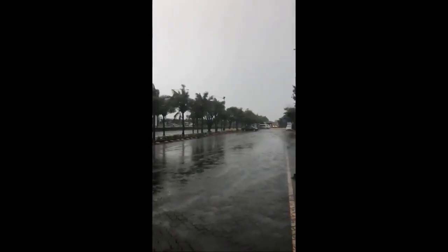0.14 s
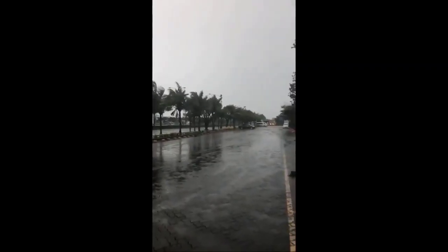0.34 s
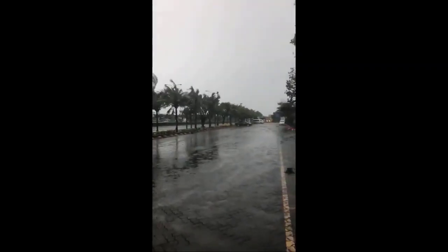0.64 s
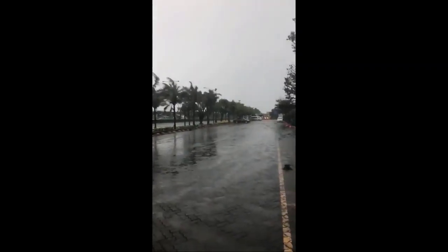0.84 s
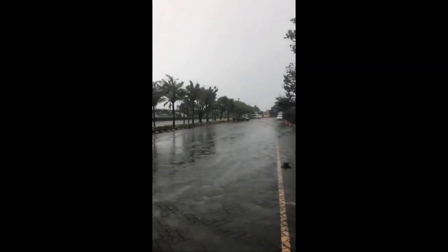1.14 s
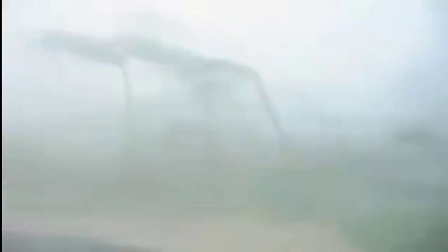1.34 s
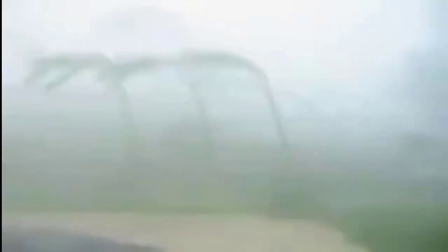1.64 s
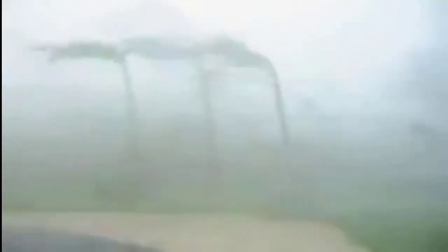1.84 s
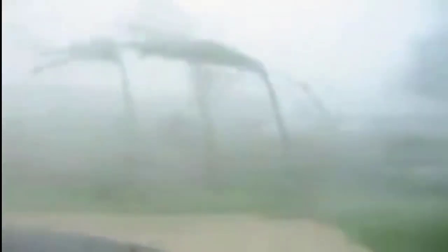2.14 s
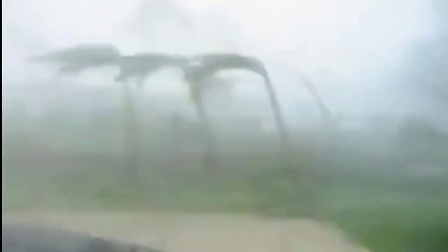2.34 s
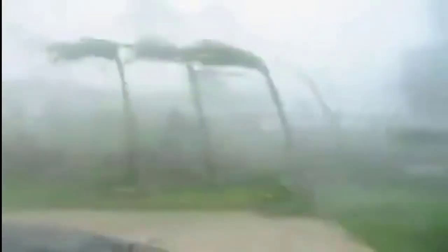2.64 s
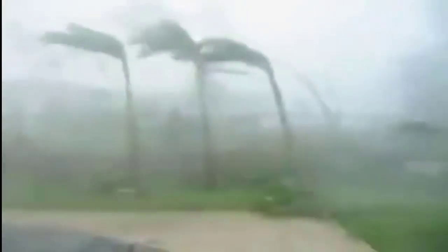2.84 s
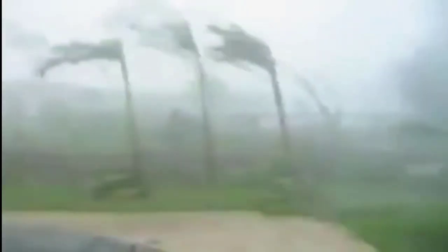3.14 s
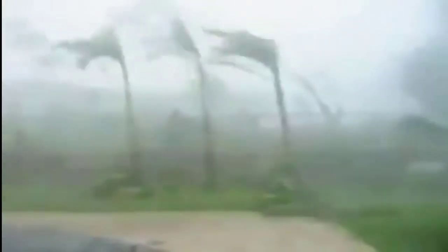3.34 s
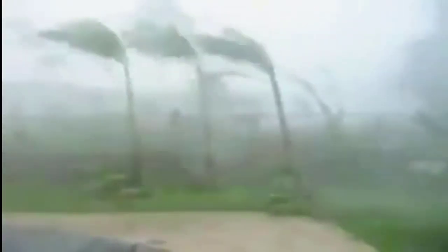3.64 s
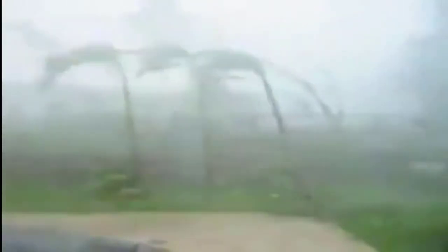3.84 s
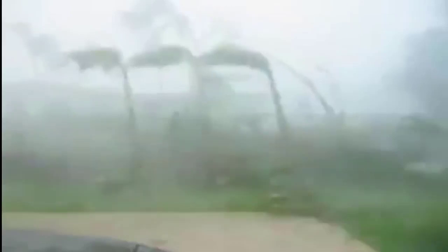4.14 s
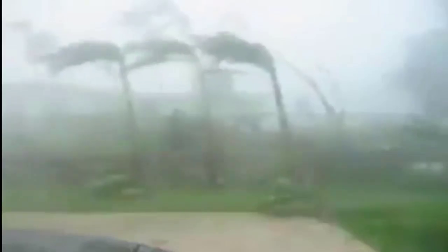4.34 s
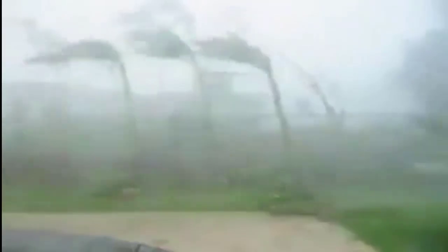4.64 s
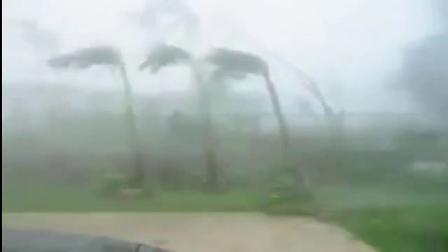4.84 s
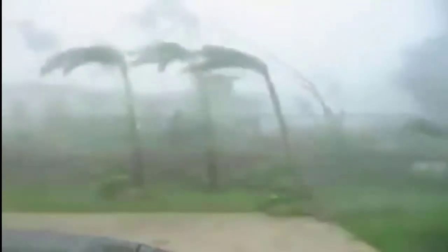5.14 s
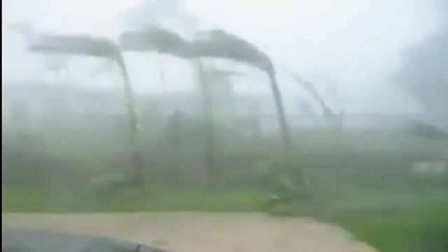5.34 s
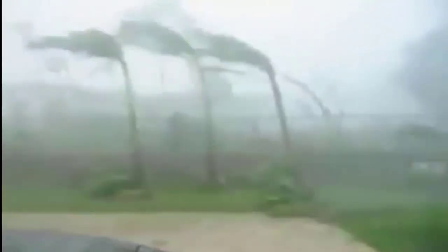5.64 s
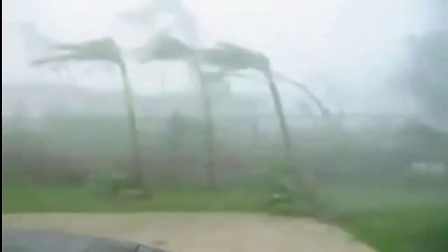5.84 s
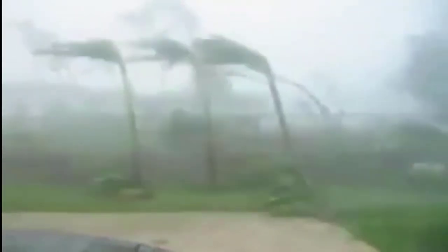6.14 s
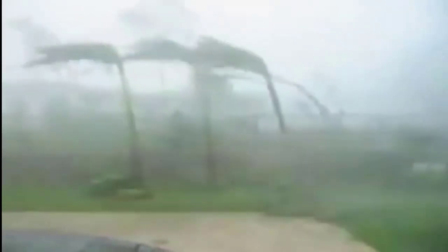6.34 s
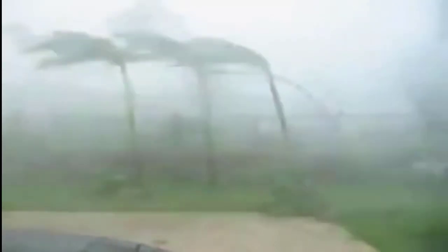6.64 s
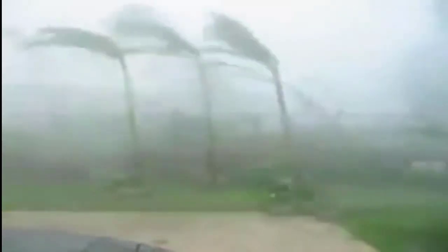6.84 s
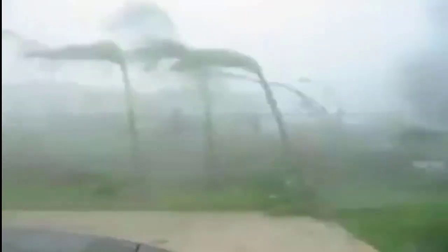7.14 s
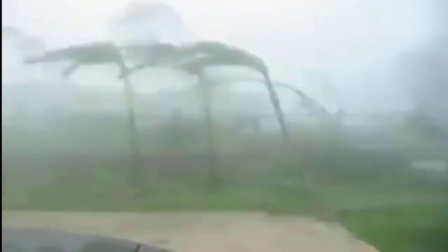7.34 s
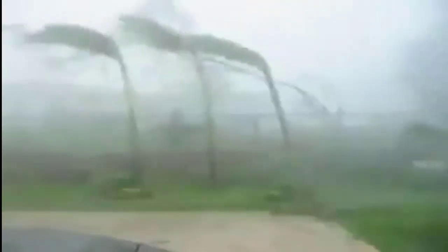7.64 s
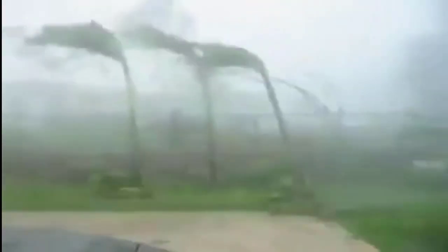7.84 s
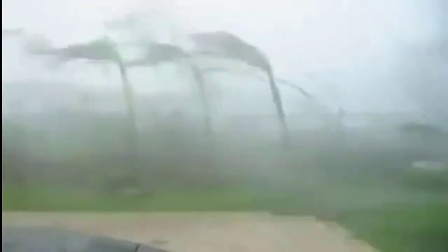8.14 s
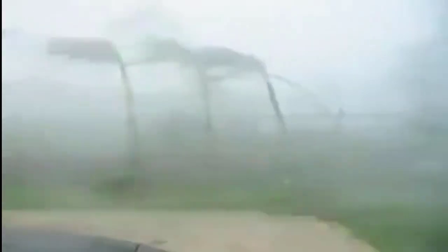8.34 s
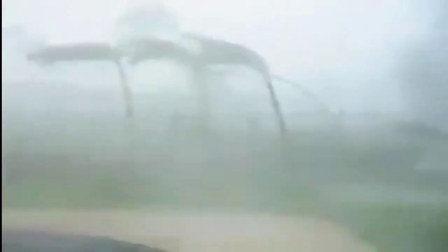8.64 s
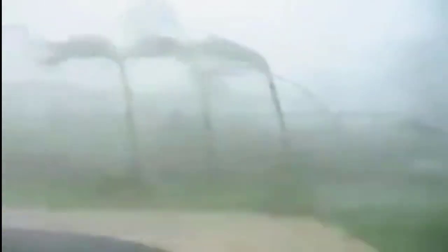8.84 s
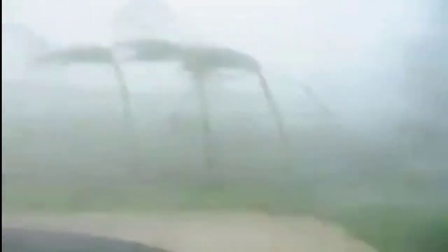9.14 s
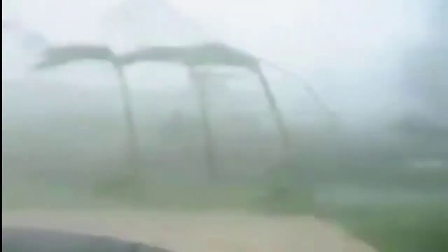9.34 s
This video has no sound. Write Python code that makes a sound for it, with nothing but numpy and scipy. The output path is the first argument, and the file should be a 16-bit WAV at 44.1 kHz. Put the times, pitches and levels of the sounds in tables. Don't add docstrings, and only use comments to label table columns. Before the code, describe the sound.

Brief roadside wind buffeting and spray hiss, an abrupt cut, then an overdriven gale booming, howling and lashing rain in flurries on a parked car.

```python
import sys
import numpy as np
from scipy import signal
from scipy.io import wavfile
from scipy.ndimage import uniform_filter1d

SR = 44100
rng = np.random.default_rng(int(sys.argv[2]) if len(sys.argv) > 2 else 0)


def master_out(mix):
    frames = np.transpose(np.atleast_2d(mix))
    ceiling = np.clip(frames, -1, 1)
    pcm = np.round(ceiling * 32767).astype(np.int16)
    wavfile.write(sys.argv[1], SR, pcm)


def gain_from_decibels(decibels):
    exponent = np.asarray(decibels, float) / 20
    return 10 ** exponent


N = 418950
T = np.arange(N) / SR
CUT_S = 1.39907
ROADSIDE = int(CUT_S * SR) + 1


def rms_one(x):
    return x / np.sqrt(np.mean(x ** 2) + 1e-20)


def white(size=N):
    return rng.standard_normal((2, size))


def drift(rate, size=N):
    r = np.exp(-40 * np.pi * rate / SR)
    noise = rng.standard_normal(size // 20 + 4002)
    slow = signal.lfilter([1], [1, -2 * r, r * r], noise)[4000:]
    return np.interp(np.arange(size) / 20, np.arange(len(slow)), rms_one(slow))


def in_time(rows, size=N):
    s, *columns = np.transpose(rows)
    return [np.interp(T[:size], s, column) for column in columns]


def bumps(rows, fall=None, size=N):
    s, rise, *lifts = np.transpose(rows)
    out = np.zeros((len(lifts), size))
    for k, middle in enumerate(s):
        up = max(rise[k], .01)
        start, end = middle - up, middle + max(fall or up, .01)
        span = slice(max(int(start * SR), 0), int(end * SR))
        shape = np.interp(T[:size][span], [start, middle, end], [0, 1, 0])
        out[:, span] += np.outer([lift[k] for lift in lifts], shape)
    return out


def cut(x, hz, kind, order=4):
    return signal.sosfilt(signal.butter(order, hz, kind, fs=SR, output="sos"), x)


def resonance(hz, width):
    r, w = np.exp(-np.pi * width / SR), 2 * np.pi * hz / SR
    noise = rng.standard_normal(N + SR)
    return rms_one(signal.lfilter([1, 0, -1], [1, -2 * r * np.cos(w), r * r], noise)[SR:])


def evened(x, size, share):
    power = uniform_filter1d(x ** 2, size=size) + 1e-12
    return rms_one(x / power ** (np.clip(share, 0, 1) / 2))


def coloured(sources, spectrum, shared_db, own_db, own_rate, tilt_db=0):
    hz, db = np.transpose(spectrum)
    edges = np.geomspace(hz[0], hz[-1], int(3 * np.log2(hz[-1] / hz[0])) + 2)
    out, flat = 0, 0
    for k, (low, high) in enumerate(zip(edges, edges[1:])):
        centre = np.sqrt(low * high)
        band = cut(sources[k % 2], [low, high], "band", order=2)
        band = band * gain_from_decibels(np.interp(np.log(centre), np.log(hz), db))
        flat = flat + np.mean(band ** 2)
        flicker_db = shared_db + own_db * drift(own_rate, size=len(band))
        out = out + band * gain_from_decibels(flicker_db + tilt_db * np.log2(centre / 1500))
    return out / np.sqrt(flat)


# t/s, level/dB, brightening/dB per octave
SPRAY = [
    (0.0, -62, 6.5),
    (0.236, -56.5, 2),
    (0.482, -56, 1),
    (1.052, -51, 1.5),
    (1.39, -48, 0.5),
]
# f/Hz, level/dB per Hz
SPRAY_COLOUR = [(300, -19), (500, -8), (1000, -6), (1600, -4.5), (2360, -18.5), (3500, -29), (5000, -34.5),
                (7000, -43.5), (10000, -47), (15000, -54)]


def spray():
    level_db, tilt_db = in_time(SPRAY, size=ROADSIDE)
    flutter_db = .5 * drift(6.3, size=ROADSIDE)
    hiss = coloured(white(size=ROADSIDE), SPRAY_COLOUR, flutter_db, own_db=1.7, own_rate=14, tilt_db=tilt_db)
    return gain_from_decibels(level_db + 2.7) * hiss


# t/s, level/dB
BREEZE = [
    (0, -29.5),
    (.21, -31),
    (.26, -39),
    (.31, -42),
    (.5, -44),
    (.65, -41.5),
    (1.39, -41),
]
# t/s, half length/s, lift/dB, extra lift of the sharp eddies/dB
PUFFS = [(.09, .05, -1.5, 4), (.14, 0.07, -0.5, -8), (.37, 0.034, 6.5, 0), (.40, 0.035, -5, -2),
         (.48, .035, -8, 0), (.52, 0.033, 5.5, -3), (.575, 0.04, 11, 11), (.87, 0.084, 5, 2.5),
         (.96, .03, -3.5, 4), (.99, 0.025, -10, 6), (1.07, 0.075, 1.5, 7), (1.13, .05, 9, -16),
         (1.18, .03, -12, 10), (1.22, 0.043, 5, 2.5), (1.39, 0.048, -5, 6.5)]
# f/Hz, level/dB per Hz
TURBULENCE = [(30, -32), (50, -5), (100, -7), (170, -8.5), (330, -16), (500, -40)]


def port_wind():
    lift_db, extra_db = bumps(PUFFS, size=ROADSIDE)
    low_db = in_time(BREEZE, size=ROADSIDE)[0] + lift_db
    sharp_db = -57.5 + 1.87 * (low_db + 41) + extra_db
    lumps = drift(32, size=ROADSIDE)
    low = coloured(white(size=ROADSIDE), TURBULENCE, 0, own_db=2.5, own_rate=23)
    low = evened(low, size=900, share=0.57)
    sharp = cut(cut(rng.standard_normal(ROADSIDE), 167, "high", order=2), 640, "low")
    sharp = evened(sharp, size=500, share=0.38)
    return gain_from_decibels(low_db + 2 * lumps) * low + gain_from_decibels(sharp_db + 4.5 * lumps) * sharp


# t/s (middle), peak level/dB, swing f/Hz, half length/s
THUDS = [(.018, -26, 107, 0.011), (.186, -24.5, 74.6, 0.0081), (.205, -28.5, 162, .008),
         (.224, -21.5, 139, 0.0026), (.372, -38, 206, 0.0075), (.571, -28.5, 210, 0.0089),
         (.587, -16, 134, 0.005), (.832, -29.5, 134, 0.013), (.886, -29, 176, 0.0144),
         (1.07, -35.5, 205, 0.014), (1.153, -32, 106, 0.0066), (1.265, -23.5, 101, 0.0043)]


def thuds():
    out = np.zeros(ROADSIDE)
    for s, peak_db, hz, half in THUDS:
        age = T[:ROADSIDE] - s
        out += gain_from_decibels(peak_db) * np.exp(-(age / max(half, .003)) ** 2) * np.sin(2 * np.pi * hz * age)
    return out


# t/s, peak level/dB, length/s, rasp share/dB
SLAPS = [(.001, -24.5, 0.0016, -4.5), (.009, -27, 0.007, -33), (0.064, -29.5, 0.0089, -24),
         (0.042, -28, 0.0067, -24), (0.022, -34, .005, -30), (0.054, -33, 0.0073, -29),
         (0.088, -42, 0.006, -40), (0.11, -35, .006, -25), (0.13, -33, 0.007, -28),
         (0.1596, -17.5, 0.0049, -30), (0.184, -9.5, 0.0058, -31), (0.2, -42, 0.0041, -32),
         (0.209, -34, 0.0093, -26), (0.22, -35, 0.0031, -24), (0.349, -39, .008, -31),
         (0.506, -39, 0.0066, -23), (0.532, -42, .006, -20), (0.567, -32, 0.0054, -29),
         (0.581, -33, .008, -22), (0.607, -35, 0.0019, -31), (0.631, -29.5, 0.0027, -27),
         (0.819, -33, 0.0065, -29), (.872, -36, 0.011, -29)]


def slaps():
    body, rasp = np.zeros((2, ROADSIDE))
    for s, peak_db, length, rasp_db in SLAPS:
        age = np.clip(T[:ROADSIDE] - s, 0, .1)
        shape = gain_from_decibels(peak_db) * np.minimum(age / .0008, 1) * np.exp(-(age / max(length, .002)) ** 2.5)
        body += shape
        rasp += shape * gain_from_decibels(rasp_db)
    middle, bright = white(size=ROADSIDE)
    middle = cut(cut(middle, 200, "high", order=2), 1520, "low", order=8)
    middle = evened(middle, size=120, share=0.87)
    bright = rms_one(cut(bright, [3500, 11000], "band", order=1))
    return gain_from_decibels(-9) * body * middle + gain_from_decibels(-10) * rasp * bright


# t/s, half length/s, lift/dB
MOANS = [
    (2.3, 0.3, 20),
    (2.85, 0.16, 19),
    (5.6, .12, 10),
    (5.9, 0.45, 16.5),
    (6.8, .2, 8),
    (8.5, 0.15, 7),
]


def moan():
    return gain_from_decibels(-61 + bumps(MOANS)[0]) * evened(resonance(247.8, 7.2), size=2500, share=0.57)


# f/Hz, level/dB per Hz
ROAR = [(45, -2.5), (60, -14), (75, -5.5), (102, -10), (152, -6.5), (222, -15), (285, -14.5), (407, -23.5),
        (600, -33)]
# t/s, half length/s, lift/dB
HOWLS = [(2.55, 0.21, 8), (3.35, .15, -0.5), (2.95, 0.82, 19), (3.65, 0.26, 12), (3.87, 0.11, -15),
         (4.32, 0.25, -11), (4.63, 0.18, 17.5), (5.4, 0.33, 11.5), (5.9, .3, 11), (6.59, 0.12, -20),
         (7.38, 0.077, 16), (7.81, .15, 12.5), (8.46, 0.51, 8), (9.02, 0.11, 13), (9.5, .3, 7)]


def gale(roar_db):
    roar = coloured(white(), ROAR, 1.5 * drift(15.5), own_db=0.0, own_rate=20)
    howl = evened(resonance(281, 6), size=2500, share=.75)
    howl_db = -54 + bumps(HOWLS)[0]
    return gain_from_decibels(roar_db + 0.25) * roar + gain_from_decibels(howl_db - 2.5) * howl


# f/Hz, width/Hz, level/dB
SWAY = [(6, 1.4, -34), (8.2, 2.0, -38), (10.5, 1.0, -37)]
# f/Hz, width/Hz, level/dB
BOOM = [(41.9, 7.1, 1.2), (31.6, 8.2, -7), (52, 8.4, -5), (21.1, 3.6, -7)]


def car_body(boom_db):
    sway = sum(gain_from_decibels(db) * resonance(hz, width) for hz, width, db in SWAY)
    boom = sum(gain_from_decibels(db) * resonance(hz, width) for hz, width, db in BOOM)
    boom = evened(cut(boom, 65, "low"), size=1600, share=0.59)
    return cut(sway, 10.7, "low") + gain_from_decibels(boom_db + 0.5) * boom


# t/s, level/dB, brightening/dB per octave
DOWNPOUR = [(1.41, -44, 0), (1.85, -45, -2.5), (2.56, -45, -1.5), (3.05, -46, -1.5), (3.44, -40.5, -1.3),
            (3.84, -43, -0.5), (4.3, -45, -1.2), (4.8, -39.5, -1), (5.19, -42, -1.1), (5.45, -36, -0.3),
            (5.75, -43, -1.6), (6.25, -41, 0.2), (6.9, -40.5, -0.8), (7.25, -47.5, -2.3), (7.8, -40, 0.2),
            (8.2, -41.5, 0.1), (8.95, -41, 0.8), (9.25, -40, -1.4)]
# t/s (peak), build-up/s, lift/dB
FLURRIES = [(1.45, 0.028, 4.5), (1.74, .12, 1.5), (1.93, 0.061, 4), (2.17, 0.11, 2.5), (2.33, 0.099, 3.5),
            (2.54, 0.43, 4), (2.83, 0.096, 5), (2.95, .04, 4.5), (3.75, 0.22, 2.5), (3.93, 0.05, 3),
            (4.5, 0.15, 7), (4.65, 0.069, 2.5), (4.76, 0.027, 2), (4.92, 0.32, 2.5), (5.25, 0.073, 2.5),
            (5.46, 0.18, 0.5), (5.72, 0.025, 5.5), (5.97, 0.043, 3.5), (6.12, 0.15, 6.5), (6.3, 0.12, 3.5),
            (6.43, 0.14, 4), (6.77, 0.097, 6.5), (6.85, 0.048, 3.5), (7.52, .05, 5), (7.61, .04, 2),
            (8.44, 0.23, 7.5), (8.53, 0.08, 3), (8.76, .12, 2.5), (8.87, 0.064, 6), (9.44, 0.13, 5.5)]
# t/s, half length/s, lift/dB
SPATTERS = [(1.62, .03, -5), (1.67, 0.036, 3), (2.03, 0.036, -0.5), (2.59, .05, -3), (2.7, .05, 2.5),
            (3.22, 0.029, 4), (3.83, .04, -4.5), (4.1, 0.038, 2), (4.58, 0.046, -1.5), (4.69, 0.034, -3.5),
            (5.7, .06, -2), (6.06, .04, -2), (6.63, .03, -2.5), (6.98, 0.037, 3.5), (7.2, .04, 1.5),
            (7.3, .05, 0), (7.42, 0.1, 2), (8.17, 0.087, -4), (8.97, 0.056, 4), (9.24, 0.027, -6.5),
            (9.32, 0.045, 2), (9.43, .03, -2.5)]
# f/Hz, level/dB per Hz
RAIN = [(230, -14.5), (380, -5), (733, -1), (1270, -7.5), (2230, -7), (3170, -14.5), (3600, -18),
        (4500, -21.5), (5200, -8.5)]
# f/Hz, level/dB per Hz
GRIT = [(5000, 2.5), (7000, -3), (10000, -4), (13000, -9), (15500, -14)]


def rain():
    drops_per_s, band_top_hz, grit_level_db = 6000, 5257, -65
    weight_db, tilt_db = in_time(DOWNPOUR)
    lift_db = bumps(FLURRIES, fall=0.04)[0] + bumps(SPATTERS)[0]
    rain_db = weight_db + lift_db
    tilt_db = tilt_db + 0.14 * lift_db
    sizes = gain_from_decibels(2.04 * np.minimum(rng.exponential(1, (2, N)), 5))
    signs = rng.choice([-1, 1], (2, N))
    drops = sizes * signs * (rng.random((2, N)) < drops_per_s / SR)
    flurry_db = 0.86 * drift(9.5) + 0.61 * drift(43)
    sheet = coloured(drops, RAIN, flurry_db, own_db=0.91, own_rate=18, tilt_db=tilt_db)
    sheet = signal.sosfilt(signal.cheby2(10, 40, 1.05 * band_top_hz, fs=SR, output="sos"), sheet)
    grit = coloured(drops[::-1], GRIT, 0.47 * flurry_db + 0.5 * tilt_db, own_db=0.1, own_rate=21)
    grit_db = 0.62 * (rain_db - rain_db.mean()) + grit_level_db
    return gain_from_decibels(rain_db + 2) * sheet + gain_from_decibels(grit_db) * grit


# t/s, half length/s, roar lift/dB, boom lift/dB
BUFFETS = [(1.41, .11, 0, -8), (1.75, .1, 3, -1.5), (1.86, 0.056, -5.5, 1.5), (1.93, 0.062, 6, -12),
           (2.0, 0.2, -5.5, 4.5), (2.3, .07, 2.5, -2.5), (2.38, 0.13, 4.5, 3.5), (2.78, 0.15, -0.5, -4.5),
           (3.08, 0.069, -5, 4.5), (3.19, .08, -1.5, 0), (3.26, 0.092, 4, -0.5), (4.16, 0.23, 3, -0.5),
           (4.5, .2, -0.5, -3), (4.77, 0.047, -1, -2), (5.42, .14, -1, -6), (5.74, 0.1, 5, -6),
           (6.6, 0.21, -3.5, -0.5), (6.77, 0.31, 3, -1), (7.02, 0.11, -3, 2.5), (7.09, 0.047, 5.5, -4),
           (7.13, 0.06, -4, 5.5), (7.83, 0.12, 0.5, -5.5), (7.92, 0.082, -4.5, 1), (8.39, 0.13, 4, -1),
           (8.53, .1, -0.5, -5.5), (8.73, 0.047, 0, 0.5), (8.82, 0.036, 2.5, 2.5), (8.91, 0.071, -4, 1),
           (9.02, 0.099, 2, 0.5), (9.41, 0.081, 0.5, 1.5)]


def scene():
    roar_lift_db, boom_lift_db = bumps(BUFFETS)
    weight_db = in_time(DOWNPOUR)[0]
    roar_db = -35 + 0.35 * (weight_db - weight_db.mean()) + roar_lift_db
    out = moan() + gale(roar_db) + car_body(-27 + boom_lift_db) + rain()
    out[:ROADSIDE] = cut(spray() + port_wind() + thuds() + slaps(), 36, "high", order=6)
    return out[None]


def band_limit(x):
    return signal.sosfilt(signal.butter(12, 15140, fs=SR, output="sos"), x)


def record(dry):
    offset, headroom = -.136, .16
    squeezed = offset + headroom * np.tanh(dry / headroom)
    mix = np.where(T < CUT_S, dry, squeezed)
    return band_limit(mix)


dry = scene()
out = record(dry)
master_out(out)
```